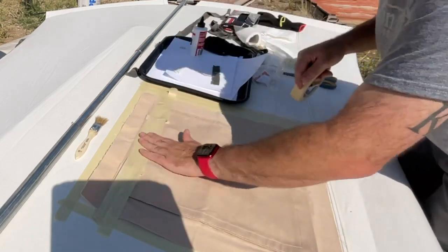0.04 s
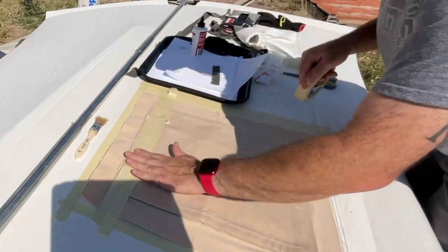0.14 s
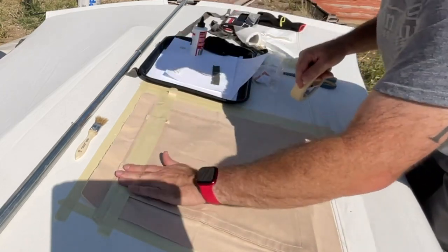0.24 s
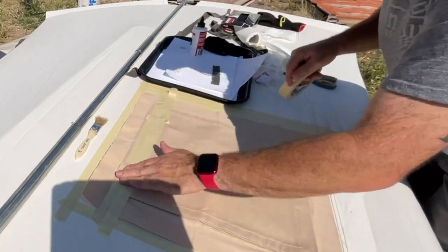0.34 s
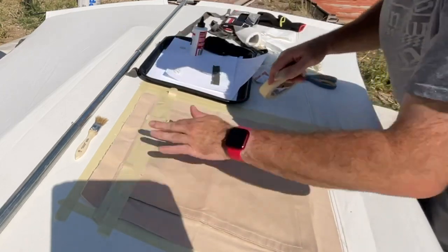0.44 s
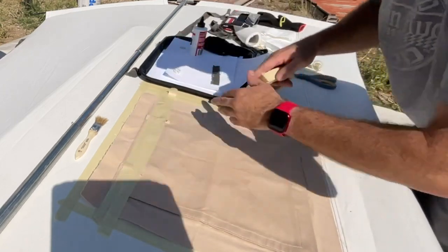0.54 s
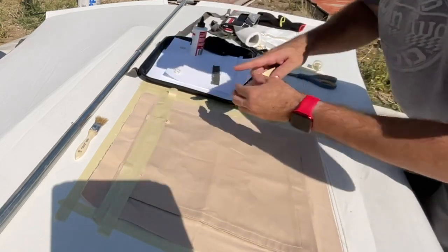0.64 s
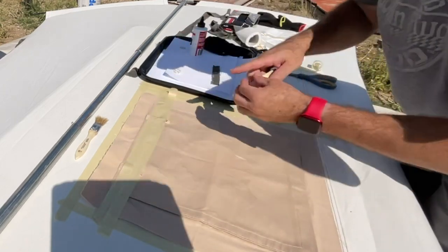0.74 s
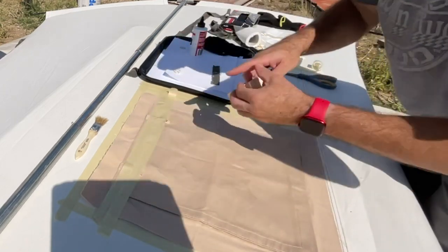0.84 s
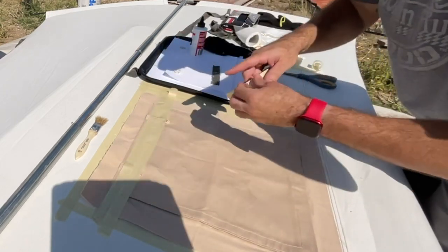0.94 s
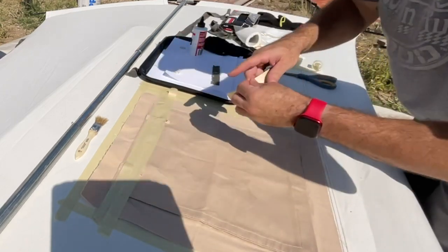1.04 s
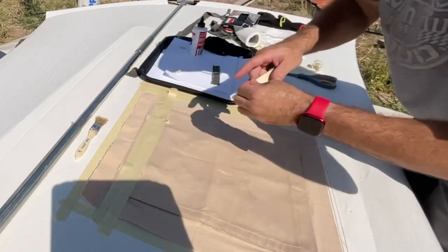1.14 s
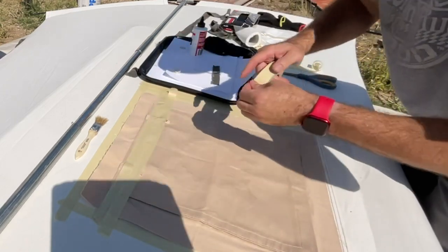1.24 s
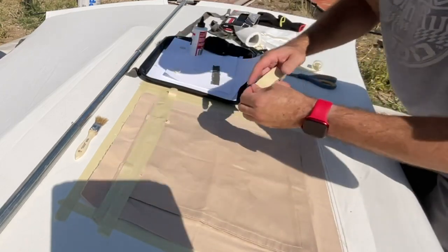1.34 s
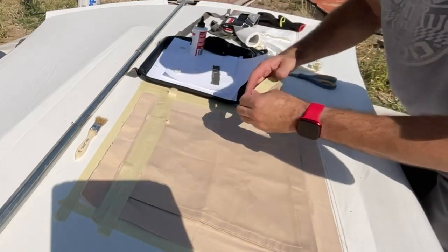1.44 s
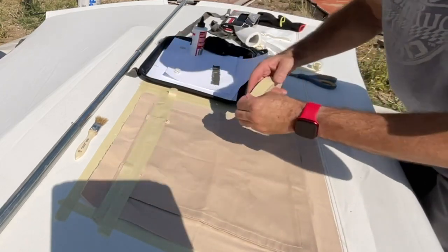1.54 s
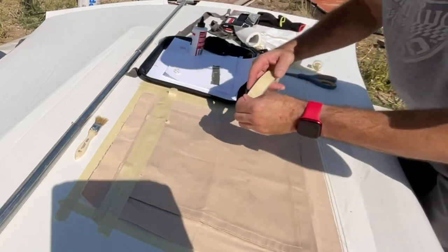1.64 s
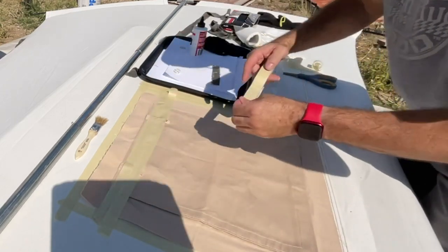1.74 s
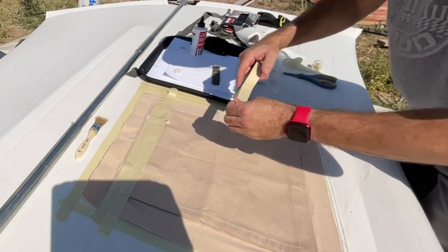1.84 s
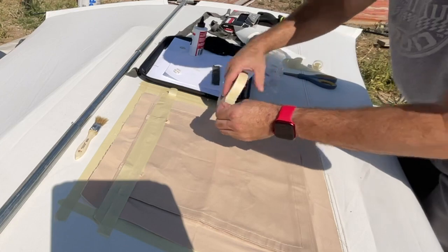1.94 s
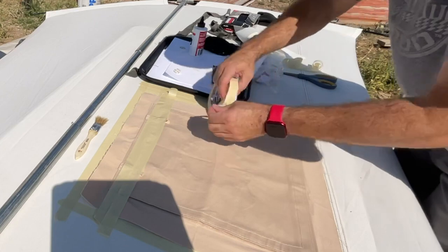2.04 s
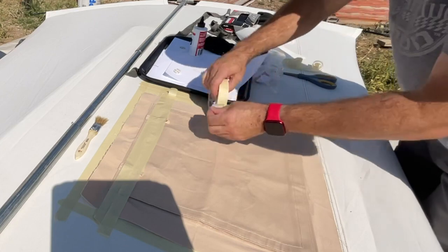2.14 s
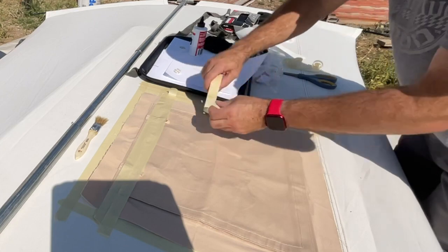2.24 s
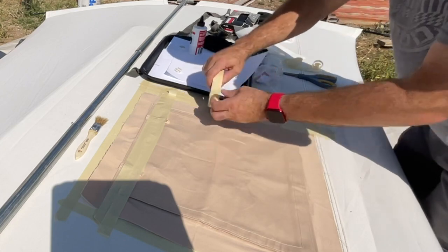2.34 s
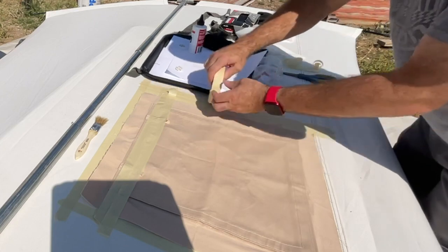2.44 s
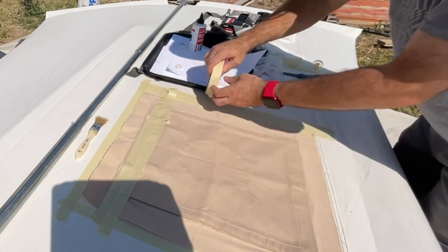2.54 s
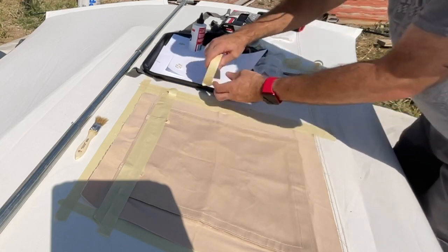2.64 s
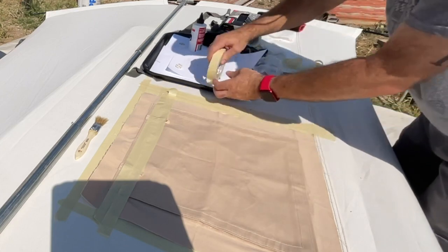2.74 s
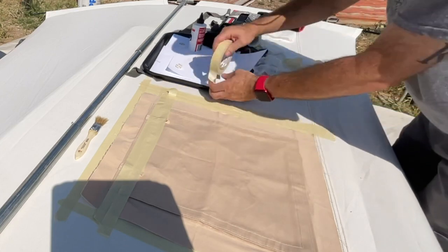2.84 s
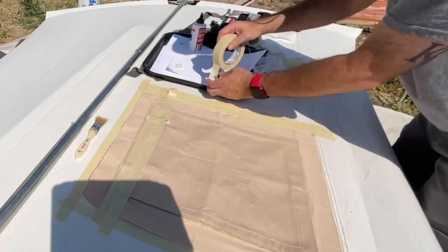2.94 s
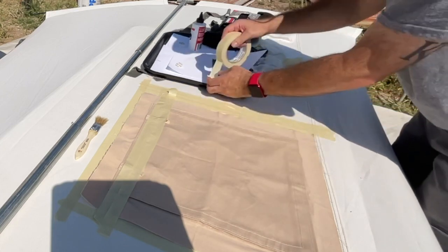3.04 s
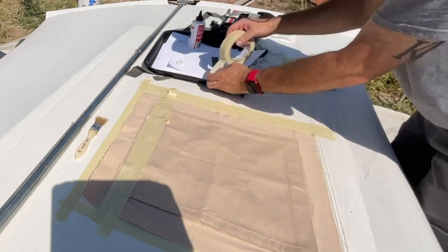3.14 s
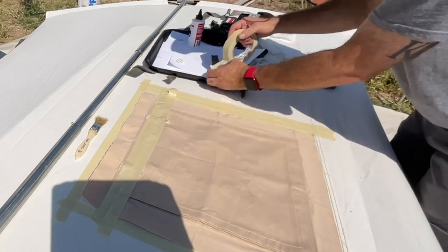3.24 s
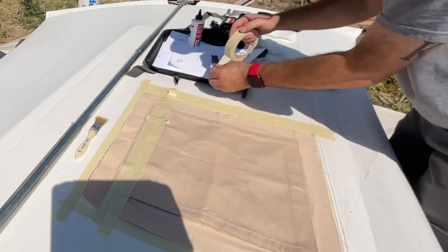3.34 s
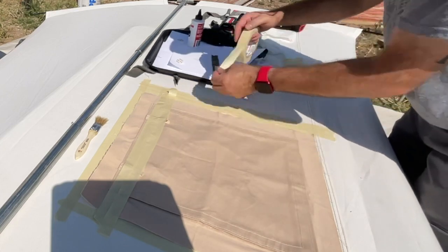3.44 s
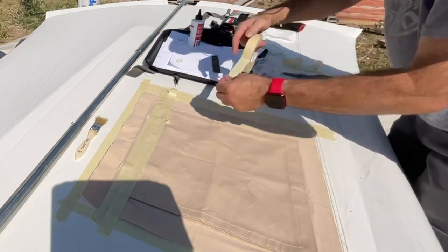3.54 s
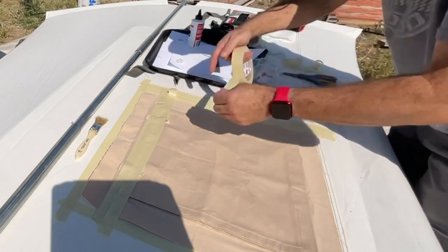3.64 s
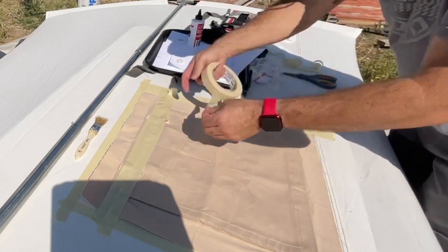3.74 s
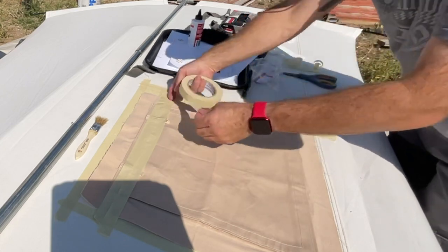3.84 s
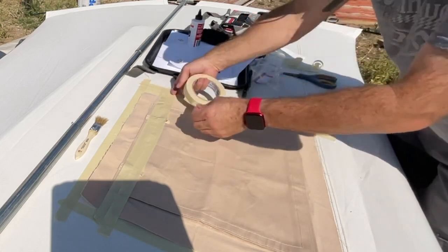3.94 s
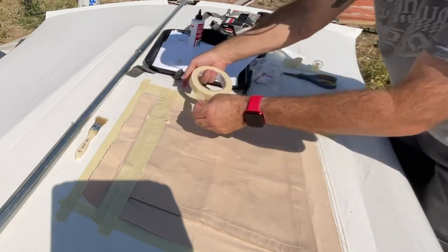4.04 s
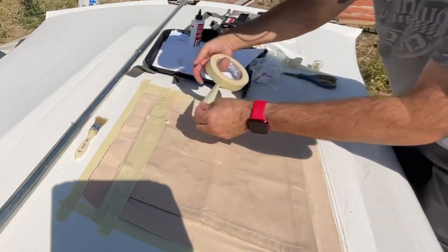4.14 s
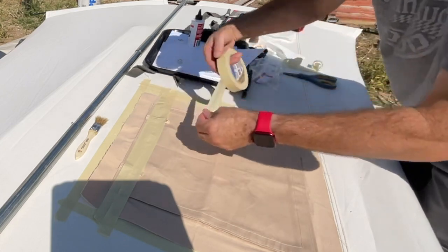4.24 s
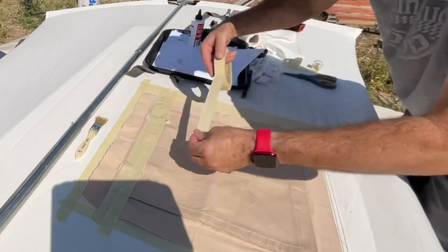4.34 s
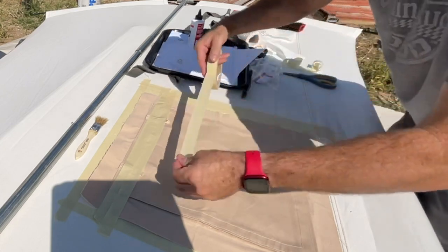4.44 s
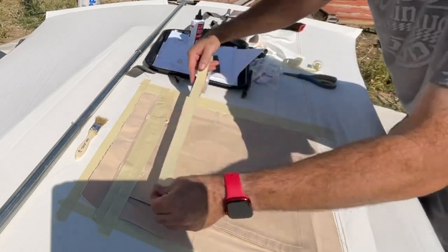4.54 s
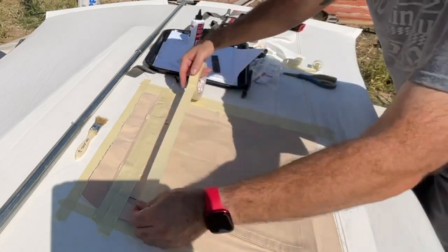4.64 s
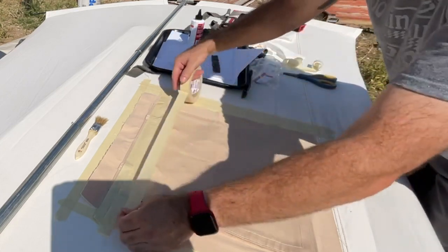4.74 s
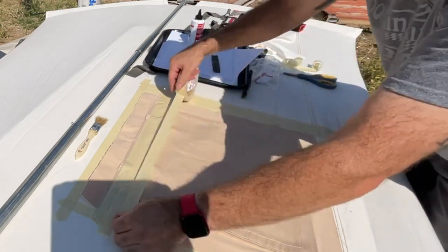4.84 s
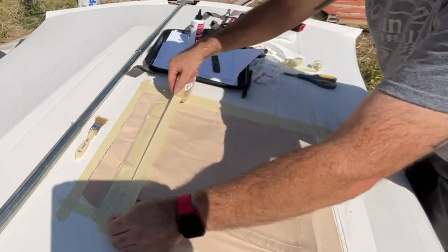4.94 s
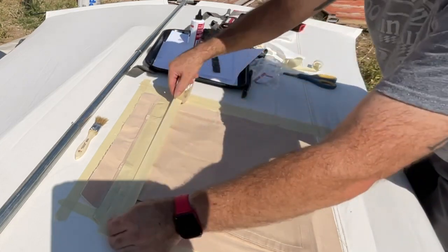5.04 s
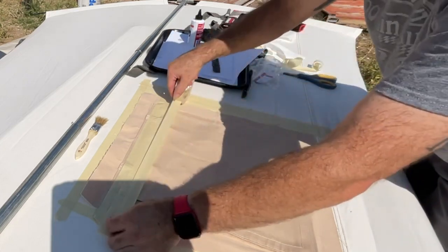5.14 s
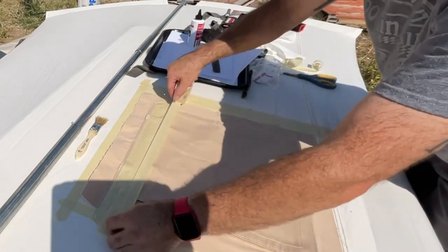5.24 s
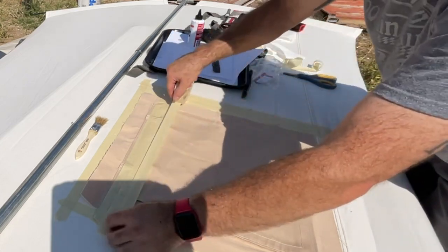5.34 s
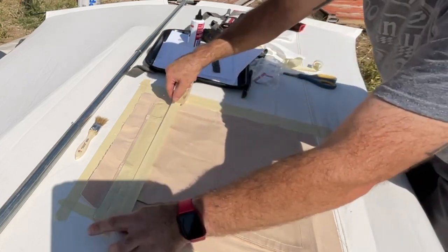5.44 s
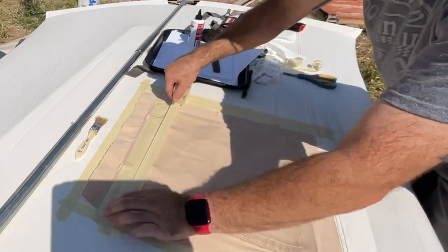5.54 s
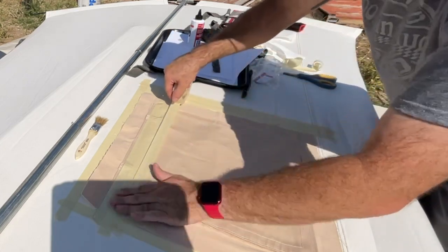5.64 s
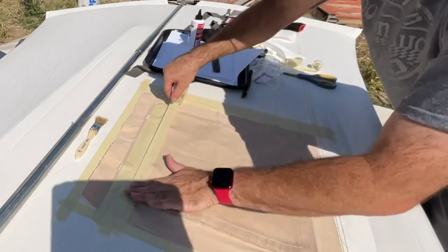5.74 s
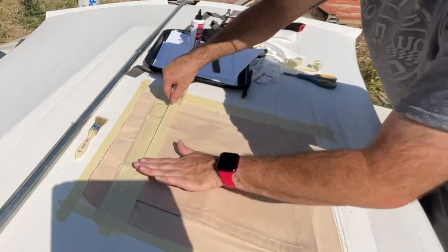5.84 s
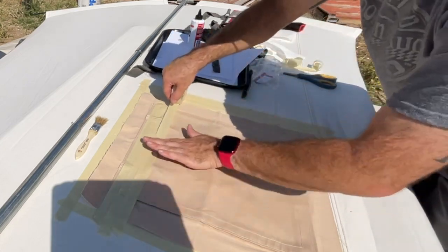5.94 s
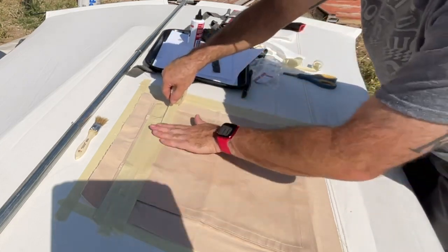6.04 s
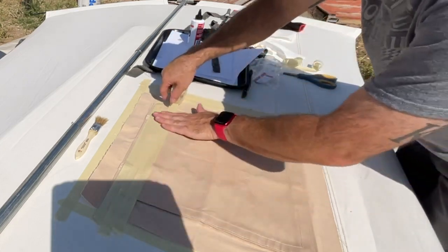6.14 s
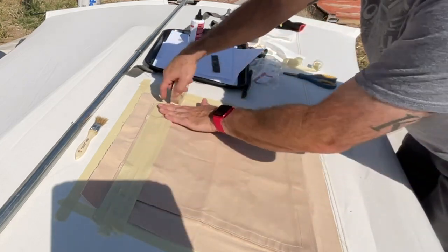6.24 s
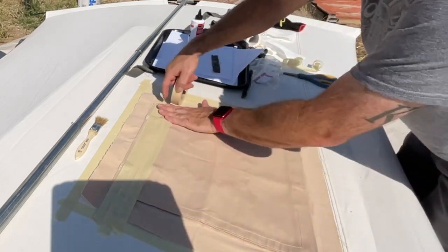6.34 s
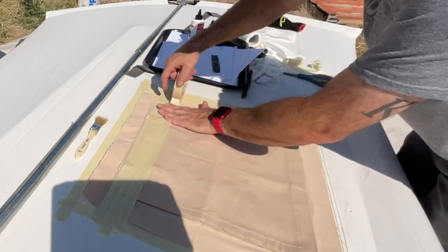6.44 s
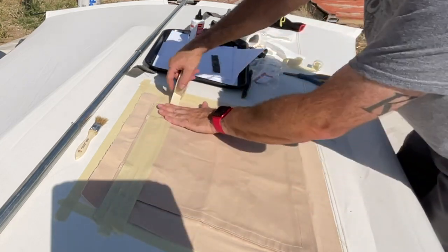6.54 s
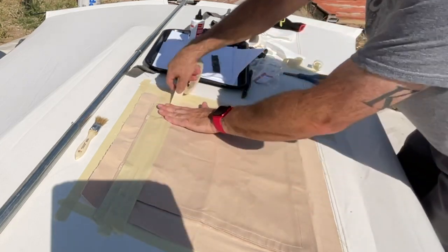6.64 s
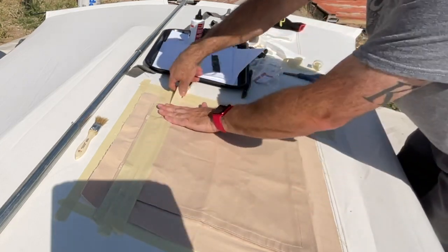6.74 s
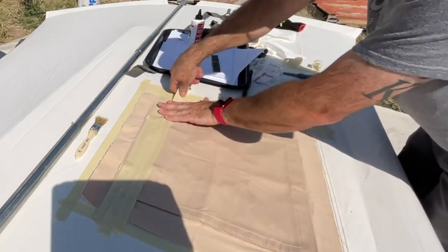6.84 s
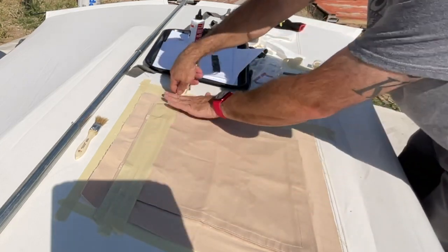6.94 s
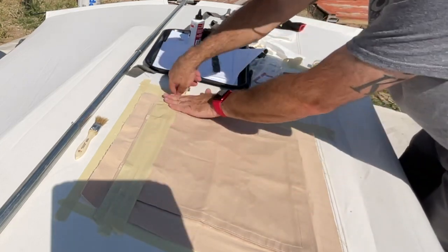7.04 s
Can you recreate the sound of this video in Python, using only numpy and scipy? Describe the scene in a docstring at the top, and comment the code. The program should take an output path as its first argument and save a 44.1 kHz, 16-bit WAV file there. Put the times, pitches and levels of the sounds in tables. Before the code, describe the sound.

Paper masking tape is pulled, torn and pressed onto fabric on a hollow panel, heard from close by in the open air. Light strokes and ticks lead to a few brief crackling peels, then one loud, longer pull just past the middle. Soft rubbing and dull taps follow, with two quick tears to finish. Behind it all is a low rumble with a far-off engine idling.

```python
"""Outdoors at a large hollow panel, with a two-port stereo microphone close to the hands.
Paper tape is peeled off a roll, torn and smoothed onto cloth on the panel. The glue lets go in dense
ticks that ring the free strip; hands stroke and touch the cloth, tape and nails snap with brief
rustling tails, knocks ring the panel. Far off, an engine idles in a low outdoor rumble."""
import sys
import numpy as np
from scipy import signal
from scipy.fft import rfft, irfft, next_fast_len
from scipy.io import wavfile
from scipy.ndimage import uniform_filter1d

SR = 44100
rng = np.random.default_rng(int(sys.argv[2]) if len(sys.argv) > 2 else 0)


def transcribe(u):
    """Save the signal u as a 16-bit wav file named by the first command-line argument.

    u: samples, shape (n,) or (channels, n), limited to [-1, 1]; the rate is SR.
    q: integer samples, one column per channel.
    """
    v = np.clip(np.atleast_2d(u).T, -1, 1)
    q = np.round(v * 32767).astype(np.int16)
    wavfile.write(sys.argv[1], SR, q)


N = 312228


def tape_pull(curve, strip_row):
    """Glue ticks ring the paper; the strip's modes sink as the free length grows."""
    # The paper's spectrum. Each row: frequency in Hz, density in dB.
    paper = [(150, -51), (250, -13.5), (547, -9), (971, -7.5), (1120, -7), (1700, -8), (2490, -9),
             (4650, -7.5), (16000, -5.5)]
    glide_s, settled_s, from_hz, to_hz, mode_db, ring_from, ring_to, paper_db, top_from, top_to = strip_row
    t = np.arange(curve[0][0], curve[-1][0], 1 / SR)
    treble_db, low_db = columns(curve, t)
    peeled = np.clip((t - glide_s) / (settled_s - glide_s), 0, 1)
    slack_db = treble_db.max() - treble_db
    tension = np.clip(1.5 - slack_db / 23, 0, 1)
    wake = np.clip(1 + (t - glide_s) / .015, .3, 1)  # the paper ring wakes as the glide starts
    strip_hz = from_hz * (to_hz / from_hz) ** peeled
    strip_db = np.maximum(mode_db - 2 * peeled, 0)
    ring_hz = ring_from * (ring_to / ring_from) ** peeled
    ring_db = (paper_db - 2 * peeled) * tension * wake
    top_db = top_from + (top_to - top_from) * peeled + .19 * np.minimum(slack_db, 17)  # slack is brighter
    controls = strip_hz, strip_db, ring_hz, ring_db, low_db, top_db

    def shape(hz, at):
        strip_hz, strip_db, ring_hz, ring_db, low_db, top_db = (np.interp(at, t, c) for c in controls)
        lowest = resonance(hz, strip_hz, 40 + .04 * strip_hz)
        third = .4 * resonance(hz, 3.2 * strip_hz, 40 + .46 * strip_hz)
        passband = step(hz, .55 * strip_hz) + .13  # little sounds below the lowest mode
        strip = passband + .55 * (gain_of(strip_db) - 1) * (lowest + third)
        ring = 1 + (gain_of(ring_db) - 1) * resonance(hz, ring_hz, .076 * ring_hz)
        tilt_db = (1 - step(hz, 2500)) * low_db + step(hz, 9600) * top_db
        flex_db = 2.92 * patches(len(hz), len(at), wide=2.8, long=24)  # small modes shift as paper bends
        return gain_of(spectrum_db(paper, hz) + tilt_db + flex_db) * strip * ring

    stick_slip = unit_rms(gain_of(1.6 * drift(len(t), size=25)))
    glue = ticks(len(t), per_s=7000, spread_db=2.5, hiss=.54) * stick_slip
    rip = coloured(glue, t[0], shape, size=512)
    # A strongly ringing mode locks the slips to itself and sings.
    zip_tone = gain_of(low_db + strip_db - 22) * wavering_tone(strip_hz, size=150) * (strip_db > 8)
    squeak = gain_of(ring_db - 18) * wavering_tone(ring_hz, size=60) * (ring_db > 8)
    return t[0], gain_of(treble_db) * (rip + zip_tone + squeak) * signal.windows.tukey(len(t), .05)


def rustle(start, full, fade, end, db, low_db, top_db, ring_hz):
    """A hand stroke, light touch or snap's tail: dense fine grains with one broad ring."""
    # The rustle's spectrum. Each row: frequency in Hz, density in dB.
    spectrum = [(590, -35), (1000, -3), (1070, -2), (1690, 1.5), (2100, 3), (2650, 2), (3800, -1),
                (6040, -1.5), (10900, -8), (14100, -13.5), (16000, -9)]
    t, treble_db = swell(start, full, fade, end, db)

    def shape(hz, at):
        ring = 1 + .47 * resonance(hz, ring_hz, 500)
        sheen_db = top_db + .5 * (np.interp(at, t, treble_db) - db)  # the top fades faster
        tilt_db = (1 - step(hz, 2800)) * low_db + step(hz, 8500) * sheen_db
        flicker_db = 2.2 * patches(len(hz), len(at), wide=4.5, long=60)
        return gain_of(spectrum_db(spectrum, hz) + tilt_db + flicker_db) * ring

    grains = ticks(len(t), per_s=4000, spread_db=0, hiss=1)
    grains *= unit_rms(gain_of(.63 * drift(len(t), size=200)))
    return t[0], gain_of(treble_db) * coloured(grains, t[0], shape) * signal.windows.tukey(len(t), .03)


def snap(start, db, ring_hz):
    """Tape or a nail snaps: a burst of crackle with a broad ring."""
    t, hz = np.arange(1024) / SR, np.fft.rfftfreq(1024, 1 / SR)
    burst = rng.standard_normal(len(t)) * np.exp(-t / .0008)
    colour = .083 * (1 - step(hz, 15000)) + .16 + resonance(hz, ring_hz, .14 * ring_hz)
    sound = irfft(rfft(np.roll(burst, 32)) * step(hz, 2200) * colour)
    return start + .00069 - 32 / SR, gain_of(db) * sound / abs(sound).max()


def panel_knock(start, db, low_hz, top_hz, ring):
    """A blow rings the panel; high bending waves run faster, so it arrives as a falling chirp."""
    # The panel's modes. Each row: frequency in Hz, level in dB, seconds to fall 60 dB.
    panel = [(64, -3.5, 0.64), (99, -1.5, 0.44), (126.3, 1, 0.26), (162.1, -8.5, 0.46), (202, -9.5, 0.31),
             (268, -6.5, 0.17), (337, -11, 0.088), (440, -12.5, 0.099), (590, -21.5, 0.043)]
    t, hz = np.arange(16384) / SR, np.fft.rfftfreq(16384, 1 / SR)
    detunes = rng.uniform(.95, 1.04, len(panel))
    modes = sum(gain_of(mode_db - 60 * t / (t60 * ring)) * np.sin(2 * np.pi * mode_hz * detune * t)
                for (mode_hz, mode_db, t60), detune in zip(panel, detunes))
    reach = step(hz, low_hz) * (1 - step(hz, top_hz))
    travel = np.exp(2j * np.pi * (.007 * hz - .38 * np.sqrt(hz)))
    sound = irfft(rfft(modes) * reach * travel) * np.minimum(t / .0011, 1) * (t < .33)
    return start, gain_of(db) * sound / abs(sound).max()


def rasp(start, full, fade, end, db, hz, width_hz):
    """Noise swells and fades in one resonance."""
    t, level_db = swell(start, full, fade, end, db)
    slow = signal.lfilter(*signal.butter(2, width_hz / 2, fs=SR), rng.standard_normal((2, len(t))))
    band = ((slow[0] + 1j * slow[1]) * np.exp(2j * np.pi * hz * t)).real
    return t[0], gain_of(level_db) * unit_rms(band) * signal.windows.tukey(len(t), .1)


def far_engine():
    """An idling engine: low orders of the firing rate, each wavering a little."""
    # Each row: time in seconds, firings per second, stack gain in dB, third order in dB.
    idle = [(0, 21.4, -56.5, -50.5), (1.5, 21.4, -54.5, -48), (2, 18.2, -50, -62), (3, 20, -63, -53),
            (4.3, 25.7, -61.5, -54.5), (5, 21.6, -78, -45), (6, 21.5, -64, -46.5), (7.08, 19.6, -68, -42)]
    # The stack of harmonics. Each row: order, level in dB.
    orders = [(2, 3), (4, -5.5), (5, -3), (6, -4), (7, -15.5)]
    per_s, stack_db, third_db = columns(idle, np.arange(N) / SR)
    phase = 2 * np.pi * np.cumsum(per_s * (1 + .0033 * drift(N, size=9000))) / SR
    stack = sum(gain_of(db + 1.2 * drift(N, size=6000)) * np.cos(k * phase) for k, db in orders)
    return gain_of(stack_db) * stack + gain_of(third_db + .55 * drift(N, size=5000)) * np.cos(3 * phase)


def outdoor_rumble():
    """Low rumble; its bass swells as the first knock rings out, and its middle swells with the sound of the
    long pull."""
    # Each row: time in seconds, bass gain in dB, middle gain in dB.
    swells = [(0.0, -20, -17.5), (0.4, -20, -18), (1.77, -25, -17), (2.25, -16.5, -15.5), (2.7, -23, -17),
              (3.3, -22, -17), (4.3, -21.5, -12), (4.8, -22, -14), (5.8, -19, -16.5), (6.68, -21.5, -15.5),
              (7.08, -25.5, -19.5)]
    # The rumble's spectrum. Each row: frequency in Hz, density in dB.
    rumble = [(12, -70.5), (20, -34.5), (46, -9), (70, 2), (168, -14), (228, -18), (399, -28), (459, -29.5),
              (542, -26.5), (1000, -26), (1260, -31.5), (1440, -32.5), (2260, -41.5), (4670, -62.5),
              (16000, -77.5)]
    hz, t, noise = signal.stft(rng.standard_normal(N), SR, nperseg=2048, noverlap=1536)
    bass_db, middle_db = columns(swells, t)
    middle = step(hz, 230)[:, None]
    level_db = (1 - middle) * bass_db + middle * middle_db + .23 * patches(*noise.shape, wide=27, long=54)
    noise *= gain_of(spectrum_db(rumble, hz)[:, None] + level_db)
    return signal.istft(noise, SR, nperseg=2048, noverlap=1536)[1][:N]


def microphone(x, ports, frame):
    """The right port hears x shifted in phase, part of it over ever-changing scattered paths."""
    spectra = signal.stft(x, nperseg=frame)[2]
    scattered = signal.istft(spectra * np.exp(2j * np.pi * rng.random(spectra.shape)), nperseg=frame)[1][:N]
    scattered *= np.std(x) / np.std(scattered)
    size = next_fast_len(N + SR)
    likeness, lead, balance_db = columns(ports, np.fft.rfftfreq(size, 1 / SR))
    left = rfft(x, size)
    right = np.exp(-1j * lead) * (likeness * left + np.sqrt(1 - likeness ** 2) * rfft(scattered, size))
    return irfft(np.array([left * gain_of(balance_db / 2), right * gain_of(-balance_db / 2)]), size)[:, :N]


def ticks(count, per_s, spread_db, hiss):
    """Random clicks over a share of smooth hiss, rms 1."""
    fires = rng.random(count) < per_s / SR
    size = gain_of(spread_db * np.minimum(rng.exponential(1, count), 3.2))
    sign, noise = rng.standard_normal((2, count))
    return unit_rms(unit_rms(fires * np.sign(sign) * size) + hiss * noise)


def coloured(x, start, shape, size=256):
    """Filters x by the moving gain shape(hz, t), holding the 3-9 kHz treble at even power."""
    hz, t, spectra = signal.stft(x, SR, nperseg=size, noverlap=3 * size // 4)
    gain = shape(hz[:, None], t + start)
    treble = (hz > 3000) & (hz < 9000)
    gain /= np.sqrt((gain[treble] ** 2).sum(0) / len(hz))
    return signal.istft(spectra * gain, SR, nperseg=size, noverlap=3 * size // 4)[1][:len(x)]


def wavering_tone(hz, size):
    """A tone on the curve hz, unsteady in strength and pitch."""
    strength = gain_of(.94 * drift(len(hz), size))
    return strength * np.cos(2 * np.pi * np.cumsum(hz * (1 + .018 * drift(len(hz), size))) / SR)


def swell(start, full, fade, end, db):
    """Times and level in dB of a sound that rises, holds and falls away."""
    t = np.arange(max(start, 0), end, 1 / SR)
    rise = np.clip((full - t) / (full - start), 0, 1)
    fall = np.clip((t - fade) / (end - fade), 0, 1)
    return t, db - 22.5 * rise ** .93 - 24.5 * fall ** .88


def patches(bins, frames, wide, long):
    """A blotchy field over frequency and time, rms 1."""
    field = uniform_filter1d(rng.standard_normal((bins, frames)), int(wide), axis=0)
    return unit_rms(uniform_filter1d(field, int(long), axis=1))


def drift(count, size):
    """Noise smoothed over size samples, rms 1."""
    return unit_rms(uniform_filter1d(uniform_filter1d(rng.standard_normal(count), size), size))


def resonance(hz, centre_hz, half_width_hz):
    return 1 / (1 + ((hz - centre_hz) / half_width_hz) ** 2)


def step(hz, corner_hz):
    """Smooth 0 to 1 rise around a corner."""
    return 1 / (1 + (corner_hz / (hz + 1)) ** 6)


def gain_of(db):
    return 10 ** (np.asarray(db) / 20)


def unit_rms(x):
    return x / np.sqrt(np.mean(x ** 2) + 1e-20)


def spectrum_db(points, hz):
    point_hz, db = np.transpose(points)
    return np.interp(np.log(hz + 1), np.log(point_hz + 1), db)


def columns(rows, at):
    knots, *values = np.transpose(rows)
    return [np.interp(at, knots, v) for v in values]


def add(mix, start, sound):
    part = mix[round(start * SR):][:len(sound)]
    part += sound[:len(part)]


def scene():
    """Tape and hands close to the microphone, over the distant background."""
    # One curve a pull. Each point: time in seconds, treble level in dB, low part's gain in dB.
    pulls = [
        [(1.17, -88, -2), (1.184, -67.5, -2), (1.25, -62, 4), (1.263, -49.5, 3.5), (1.29, -56, 5),
         (1.35, -71.5, 10), (1.37, -78, -2)],
        [(1.55, -80, -2), (1.57, -71.5, 0), (1.65, -52, 3), (1.716, -36, 1), (1.738, -38, 0.5),
         (1.776, -30, -2.5), (1.816, -33.5, -3), (1.854, -55, 0), (1.9, -78, -2)],
        [(3.43, -74, -1), (3.492, -41.5, -3), (3.504, -39, 4), (3.522, -55.5, 7), (3.535, -52, -5)],
        [(4.14, -73, -2), (4.17, -51.5, 5), (4.184, -54.5, -4), (4.284, -40, 0), (4.3, -33, 5)],
        [(4.285, -48, 5), (4.309, -24.5, -3.5), (4.37, -21, -4.5), (4.45, -23.5, -2), (4.53, -28, -1.5),
         (4.606, -30, -1.5), (4.655, -50.5, 1.5), (4.755, -68.5, -8), (4.785, -79.5, -2)],
        [(6.41, -79, 7), (6.464, -51.5, 8.5), (6.504, -34.5, 4), (6.532, -36.5, -0.5), (6.568, -54.5, -2),
         (6.59, -60, -3)],
        [(6.575, -57, -1), (6.645, -38, 1.5), (6.66, -44, -5), (6.698, -35, 5), (6.726, -31, 5),
         (6.748, -40, 0.5), (6.782, -51, -7), (6.81, -65, -1)],
    ]
    # Each pull's free strip. Each row: glide start and end in seconds; lowest mode from and to in Hz,
    # its boost in dB; paper ring from and to in Hz, its boost in dB; top gain from and to in dB.
    strips = [ (1.254, 1.318, 2500, 2050, 10, 4400, 2328, 15, -3.5, -9),
              (1.655, 1.82, 2016, 385, 15, 4220, 3060, 8.8, -1, -12),
              (3.495, 3.518, 2200, 420, 8, 6700, 3240, 4.42, -4, -12.5),
              (4.167, 4.28, 1475, 1000, -0.5, 4900, 3500, 4.3, -12, -20),
              (4.308, 4.6, 740, 470, 6, 4220, 5370, 6.9, -20.5, -5.5),
              (6.47, 6.532, 2300, 937, 9, 8080, 3010, 9.5, -11.5, -11.5),
              (6.614, 6.698, 2100, 1154, 7.5, 3500, 6850, 5, -17.5, -11)]
    # Hand strokes, light touches and the brief rustling tails of snaps. Each row: start, full, fade
    # and end in seconds; treble level, low gain and top gain in dB; ring in Hz.
    rustles = [(-.3, 0.168, .27, .36, -51.5, 0, 4, 5100), (0.248, .36, .6, 1.0, -77, -1, -12, 5300),
               (0.381, 0.392, .406, .46, -64.5, -1, 3, 5400), (.53, .55, .62, .64, -68, -8, -2, 5800),
               (0.619, 0.632, .64, .69, -59.5, -2, -6, 4730), (.695, 0.721, .725, .78, -63, -6, -4, 6100),
               (0.781, 0.8, .815, .9, -71, 0, -9, 5760), (1.02, 1.056, 1.075, 1.12, -80, -8, -8, 6500),
               (1.801, 1.88, 2.2, 2.3, -78.5, -7, -8, 4500), (1.96, 2.01, 2.03, 2.07, -72, -12, 4, 5000),
               (2.07, 2.14, 2.175, 2.23, -63.5, -15, 4, 5200),
               (2.156, 2.504, 2.63, 2.68, -58.5, 2, -6.5, 4050),
               (2.666, 2.684, 2.735, 2.775, -69, -10, 9, 6600),
               (2.931, 3.11, 3.28, 3.36, -64, -1.5, -14.5, 3800),
               (3.346, 3.379, 3.4, 3.46, -68.5, -2, 1.5, 5800),
               (3.51, 3.54, 3.56, 3.66, -48.5, -2, 4.5, 4770),
               (3.603, 3.636, 3.655, 3.72, -65, -6, 5, 4400),
               (3.853, 3.859, 3.862, 3.92, -57.5, -3, 9, 5620),
               (3.855, 3.932, 4.03, 4.08, -69.5, 2, 12.5, 4230),
               (4.801, 4.834, 4.87, 5.05, -72.5, -2.5, -12, 4770),
               (5.121, 5.17, 5.2, 5.25, -81, 1.5, -16, 3600),
               (5.388, 5.413, 5.44, 5.475, -60.5, 7, 14.5, 4590),
               (5.438, 5.495, 5.57, 5.62, -69.5, 9.5, 7.5, 5040),
               (5.65, 5.727, 6.27, 6.35, -60, -0.5, 4.5, 5450),
               (5.761, 5.86, 5.9, 5.99, -60, -3.5, -2, 4800),
               (6.031, 6.189, 6.27, 6.38, -55, -6.5, 2.5, 5600),
               (6.3, 6.36, 6.43, 6.47, -71.5, 4, -17, 3700), (4.9, 5.001, 5.3, 5.4, -93.5, 3, -18, 3600),
               (6.778, 6.843, 7.03, 7.2, -61, -1, 3, 4850)]
    # Each row: start in seconds, peak in dB, ring in Hz.
    snaps = [(0.4022, -31, 5700), (0.5376, -53, 5170), (0.5732, -45, 5970), (0.6378, -33.5, 4200),
             (0.7127, -48, 6100), (0.8045, -54, 6170), (1.261, -45.5, 4190), (2.1814, -58, 4800),
             (2.2088, -46.5, 8000), (2.4743, -48, 3400), (2.6832, -48.5, 6440), (3.495, -20, 5900),
             (3.6442, -40.5, 4550), (3.858, -33, 9200), (4.1671, -33, 4700), (4.2791, -22.5, 6030),
             (4.2854, -27.5, 3985), (4.2938, -9, 6060), (4.303, -11, 4200), (4.344, -15.5, 4280),
             (5.401, -55, 5450), (5.4185, -34, 4170), (5.4381, -37.5, 6060), (6.504, -29.5, 4300),
             (6.728, -23.5, 7000)]
    # Each row: start in seconds, peak in dB, lowest and highest pitch reached in Hz, ring time factor.
    knocks = [(2.136, -21, 40.2, 593, 0.72), (2.17, -28, 40.4, 296, 0.52), (2.943, -37.5, 69, 221, 0.765),
              (3.331, -27, 69.7, 604, 0.55), (3.373, -30, 39.25, 164.5, 0.46), (3.507, -36, 254, 701, 0.38),
              (4.744, -22.5, 73.3, 160, 0.46), (5.421, -31.5, 90.5, 606, 0.67),
              (6.555, -34.5, 81, 201, 0.396), (6.666, -30.5, 91, 301, 0.35), (6.812, -30, 70.5, 171, 0.4)]
    # Stuck tape drums on the panel as it peels. Each row: start, full, fade and end in seconds,
    # level in dB, pitch in Hz.
    drumming = [(6.466, 6.515, 6.535, 6.62, -44.5, 351.6), (6.59, 6.658, 6.74, 6.81, -43.5, 349.7)]
    # A hollow midrange rasp and one low passing drone; columns as for drumming.
    hollow_rasps = [(-.1, 0.036, .43, .5, -55.5, 755), (0.457, .55, .6, .7, -54, 760),
                    (.7, 0.797, .83, .87, -60.5, 700), (5.878, 6.01, 6.05, 6.2, -47, 785),
                    (6.136, 6.223, 6.26, 6.38, -53, 824), (6.334, 6.41, 6.45, 6.49, -58, 792)]
    drone = (3.5, 4.0, 5.05, 6, -56.5, 223)
    # How the two ports hear near and far sound. Each row: frequency in Hz, likeness from 0 to 1,
    # left lead in radians, left over right in dB.
    near_ports = [(90, .99, 0, .3), (350, .95, .1, 0), (520, .9, .7, .5), (700, .75, 1, 6),
                  (860, .85, 0, 3.5), (1100, .87, .6, -2), (1400, .85, 0, -.5), (2000, .7, -1.1, -2),
                  (2300, .75, -2.7, 2.5), (2550, .85, -3.4, 1.5), (2900, .7, -4.8, -1),
                  (3300, .72, -5.4, -2), (4000, .9, -6.2, -1.5), (4500, .95, -6.3, 0),
                  (5500, .78, -6.5, -2), (6500, .55, -6.8, -1), (8000, .95, -6.3, -.3), (12000, 1, -6.3, 0),
                  (15400, .82, -6.4, 0)]
    far_ports = [(60, .99, 0, .4), (170, .96, 0, .5), (350, .75, .2, 0), (520, .3, 1.4, 0),
                 (860, .55, 3.2, 3), (1400, .4, 4.9, .7), (2000, .15, 4.8, 1), (2600, .25, 7.6, 3),
                 (3800, .57, 6.1, -1.4), (6500, .6, 6.3, -3.5), (10000, .9, 6.3, -2)]
    near, far = np.zeros(N), outdoor_rumble() + far_engine()
    for curve, strip_row in zip(pulls, strips):
        add(near, *tape_pull(curve, strip_row))
    for source, rows in (rustle, rustles), (snap, snaps), (panel_knock, knocks):
        for row in rows:
            add(near, *source(*row))
    for row in drumming:
        add(near, *rasp(*row, width_hz=360))
    for row in hollow_rasps:
        add(far, *rasp(*row, width_hz=140))
    add(far, *rasp(*drone, width_hz=45))
    return microphone(near, near_ports, frame=384) + microphone(far, far_ports, frame=2048)


def record(dry):
    """The microphone's bass cut, then the band limit."""
    cut = signal.sosfilt(signal.butter(6, 38, "high", fs=SR, output="sos"), dry)
    return signal.oaconvolve(cut, signal.firwin(511, 15750, window=("kaiser", 9), fs=SR)[None], "same")


dry = scene()
out = record(dry)
transcribe(out)
```